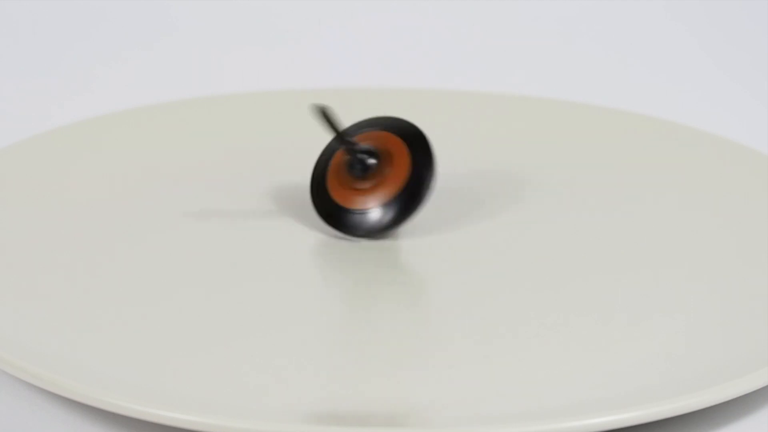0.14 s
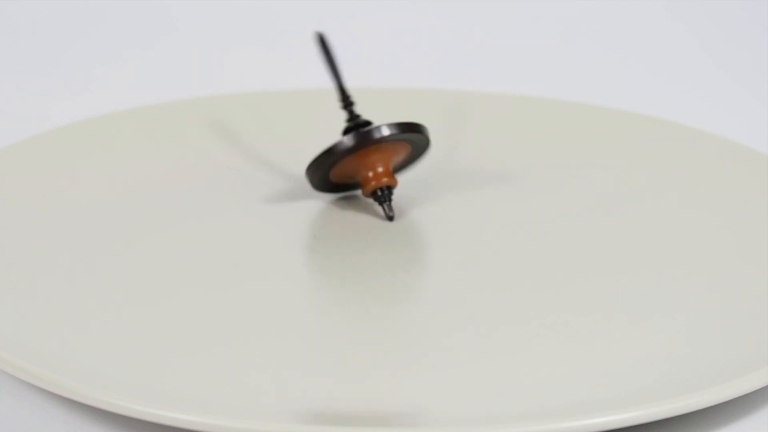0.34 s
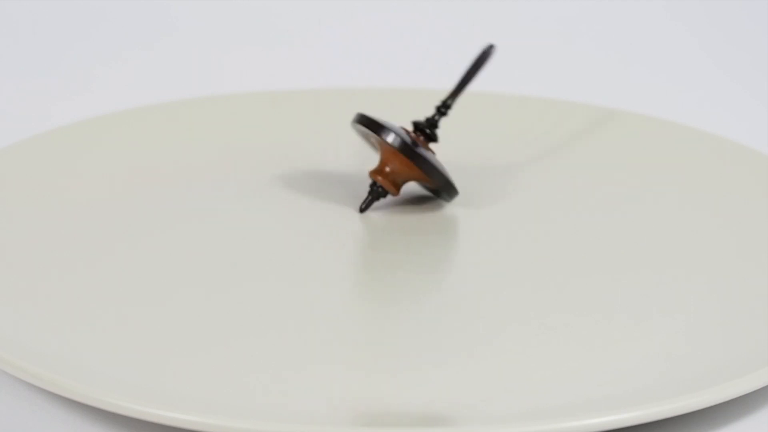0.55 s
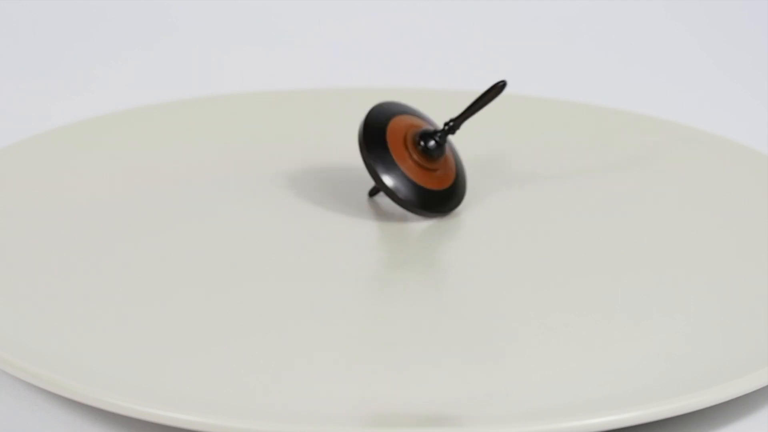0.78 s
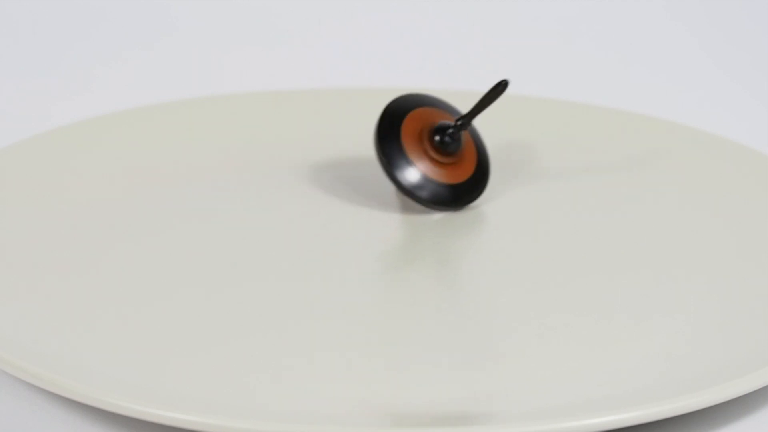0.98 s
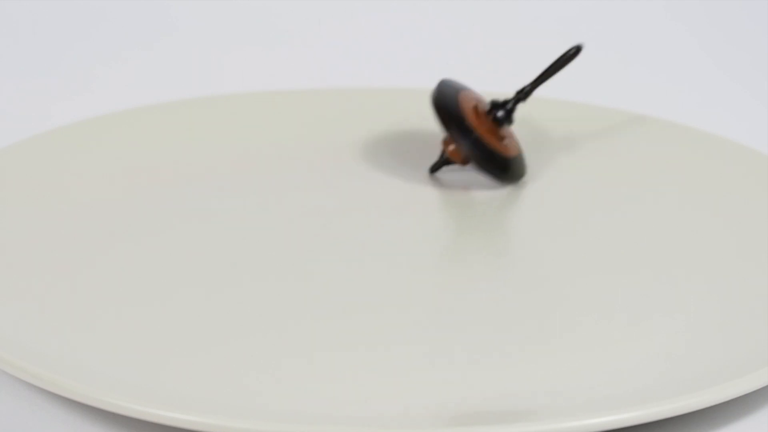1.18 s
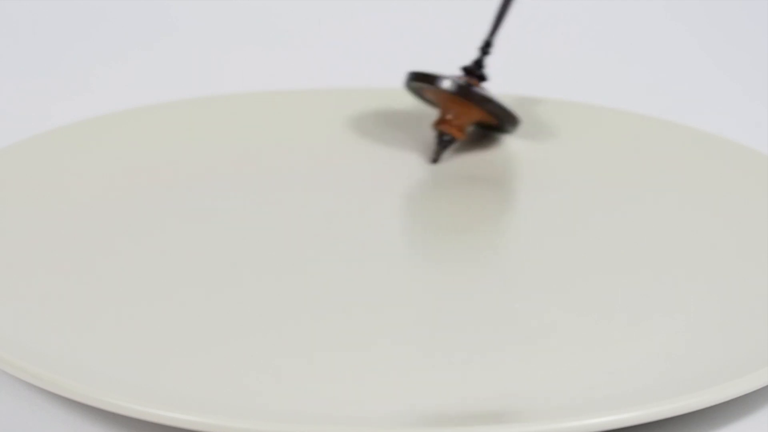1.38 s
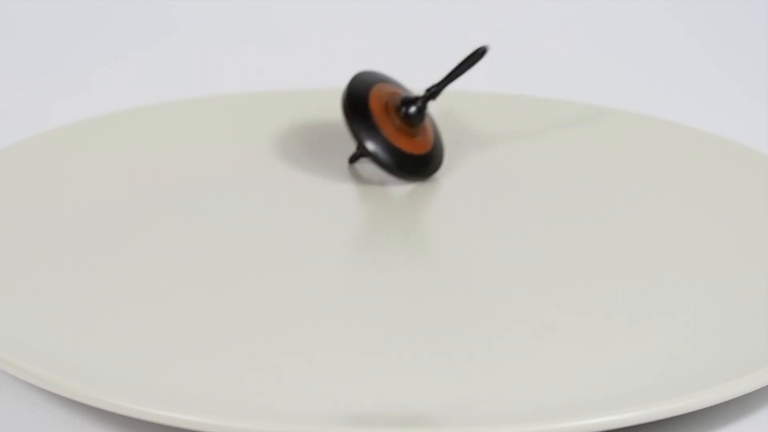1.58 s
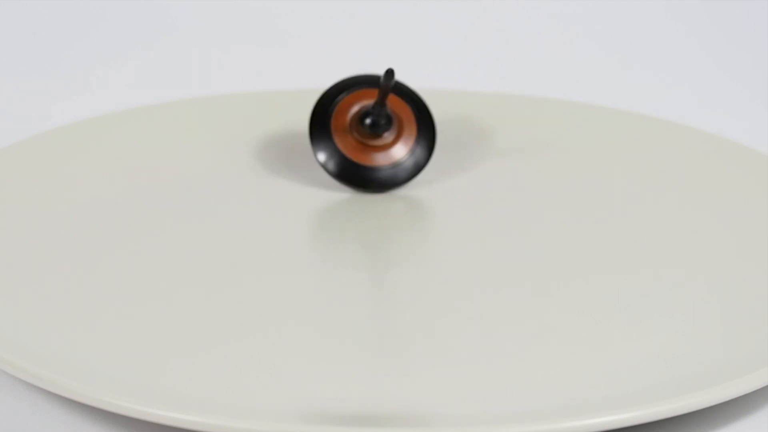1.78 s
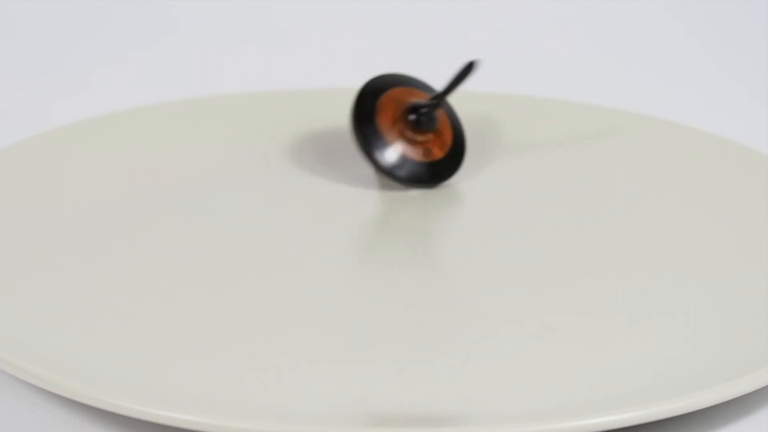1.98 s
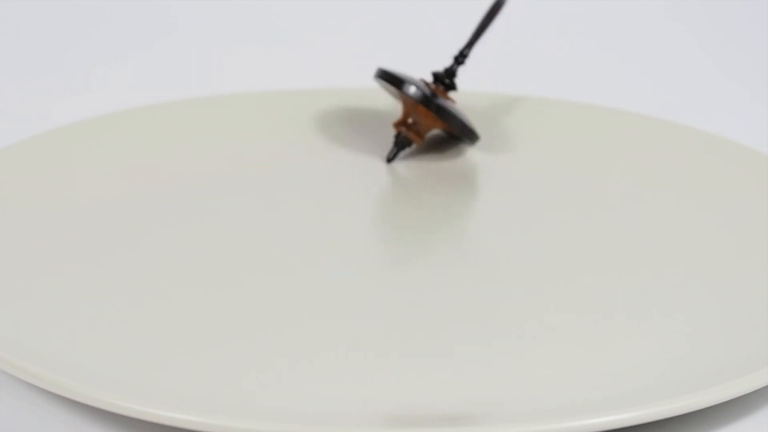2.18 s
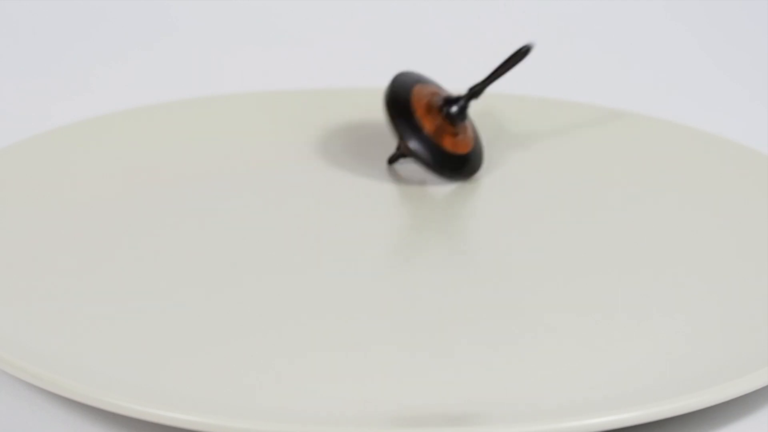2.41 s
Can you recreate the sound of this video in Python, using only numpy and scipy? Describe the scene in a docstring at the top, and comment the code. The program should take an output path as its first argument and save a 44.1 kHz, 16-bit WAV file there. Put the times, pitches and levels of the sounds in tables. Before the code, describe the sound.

A small wooden top hops with quick bright clicks on a hard plate, then rolls in a dense gritty rattle with irregular knocks, dulls and fades, stalls near silence, and faintly starts rolling again; close microphone, small quiet room.

```python
"""A small wooden top at the end of its spin, on a hard plate close to the microphone.
Its tilted disc hops, then rolls with chatter, grit and knocks, swings out towards the plate's edge and back,
stalls with a faint sliding hiss and starts to roll again. Each contact is a short pulse that rings
the plate's decaying modes; shaped noise gives the hiss, a low rumble and the table's thumps.
A small room answers, over quiet air."""
import sys
import numpy as np
from scipy import signal
from scipy.fft import rfft, irfft, next_fast_len
from scipy.io import wavfile
from scipy.ndimage import uniform_filter1d, map_coordinates

SR = 44100
rng = np.random.default_rng(int(sys.argv[2]) if len(sys.argv) > 2 else 0)


def to_wav(s):
    """Save 16-bit WAV."""
    ch = np.atleast_2d(s).T  # columns
    pcm = np.round(np.clip(ch, -1, 1) * 32767)  # PCM
    wavfile.write(sys.argv[1], SR, pcm.astype(np.int16))


N = 108045  # length in samples

# how the disc rolls: time_s, relative level_db, contact brightness_hz before any dulling
ROLL = [(0, -41, 1720), (.2, -49.5, 2430), (.26, -42, 5140), (.38, -39, 8100), (.535, -37, 8640),
        (.64, -25, 7960), (.79, -26.5, 10300), (.92, -24.5, 9000), (1.1, -25, 9600), (1.2, -26.5, 7700),
        (1.29, -23.5, 7100), (1.42, -27.5, 6160), (1.49, -31, 6830), (1.57, -27, 5700), (1.74, -28, 5800),
        (1.9, -27.5, 3980), (1.99, -39.5, 3510), (2.045, -47.5, 3000), (2.09, -89, 2796),
        (2.288, -84, 1486), (2.298, -61.5, 1710), (2.35, -48.5, 2700), (2.385, -41.5, 2800),
        (2.45, -41, 2370)]
# plate and top ring: pitch_hz, t60_s, middle_db and edge_db (relative, struck in the middle or near the edge)
MODES = [(1074.3, 0.19, -14.5, -13), (1175, .11, -44, -17), (1616, 0.066, -21, -27),
         (1796, 0.018, -7.5, -15), (1850.5, 0.04, -1, -9.5), (2360, 0.086, -31.5, -21),
         (2546, 0.11, -26.5, -12.5), (2786, 0.061, -18, -16), (2899, 0.068, -14.5, -21),
         (3088, 0.035, -20.5, -19.5), (3325, 0.12, -45, -7), (4135, 0.041, -10, -15.5),
         (4242, 0.071, -14.5, -9.5), (5172, 0.1, -54, -10.5), (5693, 0.024, -17, -21.5),
         (6255, 0.1, -56, -18.5), (7467, 0.046, -28, -28.5)]


def amp(db):
    """Decibels to gain."""
    return 10 ** (np.asarray(db) / 20)


def unit(x):
    """Scale to rms 1."""
    return x / np.sqrt(np.mean(x ** 2) + 1e-20)


def along(points, hz):
    """Read (Hz, value) points on a log frequency axis."""
    f, v = np.transpose(points)
    return np.interp(np.log(hz + 1), np.log(f + 1), v)


def curves(rows, at):
    """Each column after the time, read at the given times."""
    s, *cols = np.transpose(rows)
    return [np.interp(at, s, c) for c in cols]


def filtered(x, response):
    """x with its spectrum multiplied by a response of frequency."""
    n = x.shape[-1]
    m = next_fast_len(n + 8192)
    hz = np.fft.rfftfreq(m, 1 / SR)
    return irfft(rfft(x, m) * response(hz), m)[..., :n]


def noise(colour, size):
    """Coloured noise of rms 1."""
    white = rng.standard_normal(size)
    return unit(filtered(white, lambda hz: amp(along(colour, hz))))


def contacts(times, gains, bright_hz, size=128):
    """Force of short contacts; the softer one is, the less treble it has."""
    treble_slope = 5.34  # steepness of the treble loss
    hz = np.fft.rfftfreq(size, 1 / SR)
    spectra = 1 / (1 + (hz / bright_hz[:, None]) ** treble_slope)
    pulses = np.fft.fftshift(irfft(spectra), axes=1)
    centres = np.round(times * SR).astype(int)[:, None]
    where = np.clip(centres + np.arange(size) - size // 2, 0, N)
    return np.bincount(where.ravel(), (gains[:, None] * pulses).ravel(), N + 1)[:N]


def hops():
    """Single blows as the disc leaves the plate and lands again."""
    # time_s, relative strength_db, contact brightness_hz
    landings = [(0.045, -15, 5160), (0.102, -13, 1600), (0.1288, -18.5, 14220), (0.1638, -12, 4970),
                (0.23, -14.5, 8020), (.235, -7, 8500), (0.2768, -0.5, 9800), (0.3176, -2, 10900),
                (0.3554, 1, 10500), (0.392, 2.5, 9420), (0.4615, -4, 7000), (2.297, -39, 1688),
                (2.37, -24, 3520)]
    s, db, bright_hz = np.transpose(landings)
    return contacts(s, amp(db + 6.5), bright_hz)


def knocks():
    """The rim catches on the plate as it rolls; each knock is as bright as the roll at that moment."""
    # time_s, relative strength_db
    catches = [(0.4214, -1), (0.473, 0.5), (0.5054, -4.5), (0.5135, -2.5), (0.5454, 2), (0.5549, -1.5),
               (0.586, -3), (0.609, 0), (0.6319, 3), (0.6475, 3), (0.6674, -9), (0.6819, 3.5),
               (0.6983, -4.5), (0.7145, 2.0), (0.7549, -5), (0.767, -4), (0.8042, -2.5), (0.8533, -2),
               (0.8854, -3), (0.9234, -1), (0.9362, -3.5), (0.9578, -3), (0.9676, -5), (0.982, 0),
               (0.9912, -6), (1.0125, -4.5), (1.0564, -8.5), (1.1422, -6.5), (1.1741, -6.0), (1.2552, -3.5),
               (1.3361, -3), (1.3483, -9.5), (1.4198, -10), (1.4492, -5), (1.5097, -17), (1.5187, -7),
               (1.5544, -3.5), (1.5796, -7.0), (1.5941, -3), (1.6096, -15), (1.6347, -6), (1.6649, -3.5),
               (1.7021, -2.5), (1.726, -9.5), (1.7451, -5), (1.7895, -7), (1.7997, -7.5), (1.9024, -9),
               (1.9361, -6.5), (1.9805, -9.5)]
    s, db = np.transpose(catches)
    bright_hz = curves(ROLL, s)[1]
    return contacts(s, amp(db + 4.5), bright_hz)


def bumps(rate, scatter, spread_db, dulling, count):
    """A loose train of tiny blows that follows the level and brightness of the roll."""
    chance = rng.standard_normal((count, 2))
    s = (np.arange(count) + scatter * chance[:, 0]) / rate
    db, bright_hz = curves(ROLL, s)
    uneven = unit(amp(spread_db * chance[:, 1]))
    gains = amp(db) * uneven * np.sqrt(SR / rate)  # sparser bumps are stronger
    return contacts(s, gains * (s > 0), bright_hz * dulling)


def rolling():
    """The disc chatters along, with fine grit between the bounces."""
    # rate in bumps per second, scatter in mean intervals
    chatter = bumps(rate=125, scatter=.2, spread_db=3, dulling=0.92, count=600)
    grit = bumps(rate=1200, scatter=2, spread_db=4, dulling=0.9, count=5000)
    return amp(-1.0) * chatter + amp(-6.5) * grit


def ring(mode_db, clack, clack_db):
    """The plate's answer to one blow: its lowest mode, and the other modes over a short dense clack."""
    mode_spread_db, mode_rise_s = 1.5, .0005
    clack_t60_s, clack_rise_s = 0.043, .0004
    low_band_hz = 440  # weak modes about this close to the lowest one go with it
    t = np.arange(SR // 4) / SR
    hz, t60 = np.transpose(MODES)[:2, :, None]

    signs = (-1) ** np.arange(len(hz))
    gains = amp(mode_db + mode_spread_db * rng.standard_normal(len(hz))) * signs
    modes = np.sin(2 * np.pi * hz * t) * amp(-60 * t / t60) * (1 - np.exp(-t / mode_rise_s))
    modes *= gains[:, None] / np.linalg.norm(modes, axis=1, keepdims=True)

    dense = noise(clack, size=len(t)) * amp(-60 * t / clack_t60_s) * (1 - np.exp(-t / clack_rise_s))
    dense = amp(clack_db) * dense / np.linalg.norm(dense)
    near = filtered(dense, lambda f: np.exp(-((f - hz[0]) / low_band_hz) ** 2))
    return modes[0] + near, modes[1:].sum(0) + dense - near


def plate(blows, roll, count=4):
    """Each blow clicks; where the disc runs, and which point of it touches, decide how the modes ring."""
    # where the disc runs: time_s, place (0 middle of the plate to 1 near its edge)
    path = [(1.11, 0.055), (1.19, 0.67), (1.27, 0.73), (1.37, 0.78), (1.44, 0.53), (1.51, 0.083)]
    # lowest mode, which fades at some places on the disc's path: time_s, relative level_db
    low_mode = [(.15, 3.5), (.38, -0.5), (.5, -0.5), (1.05, 0), (1.13, -16), (1.25, 1), (1.42, -0.5),
                (1.5, -44), (1.6, -19.5), (1.68, -1.5), (1.85, -6.5), (1.97, -14), (2.3, 4), (2.42, -26)]
    # dense weak modes between the strong ones, struck in the middle: pitch_hz, relative density_db per Hz
    clack_middle = [(100, -53.5), (450, -35.5), (800, -50.5), (1230, 17), (1400, 2), (1900, 21.5),
                    (2400, -6.5), (3000, 20), (3700, -2), (4300, 12.5), (5100, -4.5), (5800, 9.5),
                    (6400, -18.5), (7000, -18.5), (7550, 8.5), (8600, -54), (9400, -4), (10700, 14),
                    (13000, -7), (15300, 2.5)]
    # the same struck near the edge: pitch_hz, relative density_db per Hz
    clack_edge = [(100, -38), (400, -26), (550, -2), (1200, -17.5), (1400, 4.5), (2400, 4), (3100, -8.5),
                  (3800, 3), (4400, 4), (5800, -18), (7400, -10.5), (8100, -44.5), (8700, -2), (9400, -19),
                  (10600, 11), (12000, -7.5), (15000, -2.5)]
    touch_s = .016  # a new point of contact is drawn this often
    bass_cut_hz = 523  # the plate's sound is cut off below this

    t = np.arange(N) / SR
    edge = np.clip(curves(path, t)[0], 0, 1)
    low_gain = amp(curves(low_mode, t)[0])
    middle_db, edge_db = np.transpose(MODES)[2:]
    touch = np.take(rng.integers(count, size=512), (t / touch_s).astype(int), mode="wrap")

    click_band = signal.butter(4, [2240, 4850], "band", fs=SR, output="sos")
    out = amp(-9.5) * signal.sosfilt(click_band, blows)
    places = [(1 - edge, middle_db, clack_middle, -9.5), (edge, edge_db, clack_edge, -3)]
    for share, mode_db, clack, clack_db in places:
        for k in range(count):
            low, rest = ring(mode_db, clack, clack_db)
            touching = uniform_filter1d((touch == k).astype(float), size=128)
            push = (blows + roll) * share * touching
            ringing = signal.fftconvolve(push * low_gain, low) + signal.fftconvolve(push, rest)
            out += ringing[:N]
    bass_cut = signal.butter(2, bass_cut_hz, "high", fs=SR, output="sos")
    return signal.sosfilt(bass_cut, out)


def slides():
    """A thin hiss of the tip slipping on the glaze while the top stalls: swelling bands of noise."""
    # start_s, peak_s, end_s, level_db at the peak, centre pitch_hz, width_hz to each side
    slips = [(2.055, 2.096, 2.315, -60.5, 6540, 523), (2.15, 2.205, 2.26, -73.5, 10000, 681)]
    fade_db = 32  # drop from the peak to the start or end
    t, out = np.arange(N) / SR, np.zeros(N)
    for start, peak, end, db, hz, width in slips:
        away = np.maximum((peak - t) / (peak - start), (t - peak) / (end - peak))
        hiss = filtered(rng.standard_normal(N), lambda f: 1 / (1 + ((f - hz) / width) ** 4))
        out += amp(db - fade_db * away) * unit(hiss)
    return out


def rumble():
    """The plate rumbles under the rolling disc: low noise that follows a level curve."""
    # time_s, level_db
    swell = [(0, -88), (.37, -66), (.87, -67), (.95, -52.5), (1.02, -69.5), (1.16, -49), (1.4, -47.5),
             (1.56, -62), (1.98, -71.5), (2.04, -62), (2.12, -93.5), (2.28, -92), (2.33, -63),
             (2.45, -84.5)]
    # pitch_hz, relative density_db per Hz
    rumble_colour = [(25, -49), (480, -15.5), (543, 1.5), (610, -10), (710, 3.5), (810, -7.5), (950, 2.5),
                     (1300, -17.5), (3000, -73)]
    t = np.arange(N) / SR
    return amp(curves(swell, t)[0]) * noise(rumble_colour, size=N)


def thumps():
    """The table under the plate thumps dully: low noise of randomly wavering level."""
    # time_s, level_db before the wavering
    swell = [(.2, -90), (.38, -70), (.5, -84), (.65, -68), (1.44, -66), (1.53, -76.5), (1.6, -72),
             (1.72, -87.5), (1.82, -68.5), (1.89, -93)]
    # pitch_hz, relative density_db per Hz
    thump_colour = [(25, -32), (65, -25), (120, 7.5), (195, -4.5), (245, 11.5), (310, 2.5), (1000, -50)]
    uneven_db, knots_per_s = 3.5, 28
    t = np.arange(N) / SR
    uneven = map_coordinates(rng.standard_normal(size=512), [t * knots_per_s])
    return amp(curves(swell, t)[0] + uneven_db * uneven) * noise(thump_colour, size=N)


def room(x):
    """A small room's answer as decaying noise, narrow in the bass and around 1900 Hz, wide in the treble."""
    # pitch_hz, t60_s
    decay = [(150, 0.38), (1000, 0.12), (4000, 0.18), (12000, 0.16)]
    # side signal of the answer: pitch_hz, gain_db
    side_width = [(100, -16.5), (1100, -9.5), (1900, -18), (3000, -8), (5000, -6.5), (10000, -1.5)]
    delay_s = .0035
    hz, t, z = signal.stft(rng.standard_normal((2, SR // 3)), SR, nperseg=256)
    fading = z * amp(-60 * t / along(decay, hz)[:, None])
    tail = signal.istft(fading, SR, nperseg=256)[1]
    tail = np.pad(tail / np.linalg.norm(tail[0]), ((0, 0), (int(delay_s * SR), 0)))
    mid, side = signal.fftconvolve(x[None], tail, axes=1)[:, :N]
    side = filtered(side, lambda f: amp(along(side_width, f)))
    return np.array([mid + side, mid - side])


def quiet_air():
    """Steady stereo noise, partly shared by both sides."""
    # pitch_hz, relative density_db per Hz
    air_colour = [(20, -23), (120, -4), (250, -6.5), (1200, -17.5), (15000, -18.5)]
    shared = noise(air_colour, size=N)
    separate = np.array([noise(air_colour, size=N), noise(air_colour, size=N)])
    return amp(-82.5) * (shared + amp(4.0) * separate)


def scene():
    """The top on its plate, the room and its quiet air."""
    blows = hops() + knocks()
    top = plate(blows, rolling()) + slides() + rumble() + thumps()
    return top + amp(-3) * room(top) + quiet_air()


def record(dry):
    """The treble leans to the right; nothing passes above the band limit."""
    # pitch_hz, left minus right_db
    balance = [(200, 0.5), (4000, 0), (9000, -2.5), (14000, -2.5)]
    top_hz = 15850
    halves = np.array([[.5], [-.5]])  # each side takes half the difference
    return filtered(dry, lambda hz: amp(along(balance, hz) * halves) * (hz < top_hz))


dry = scene()
out = record(dry)
to_wav(out)
```